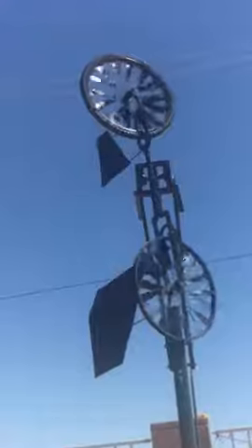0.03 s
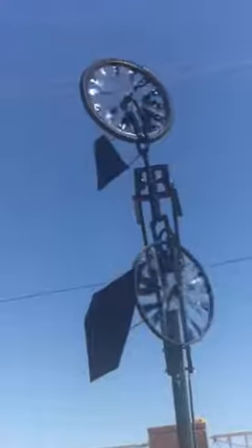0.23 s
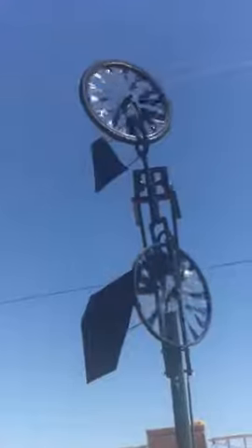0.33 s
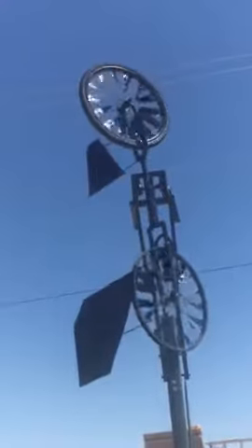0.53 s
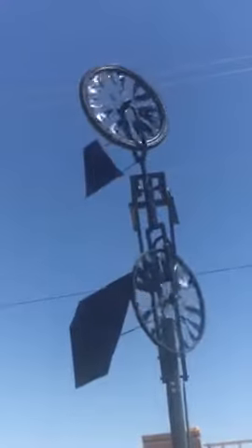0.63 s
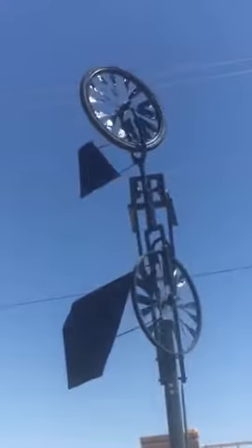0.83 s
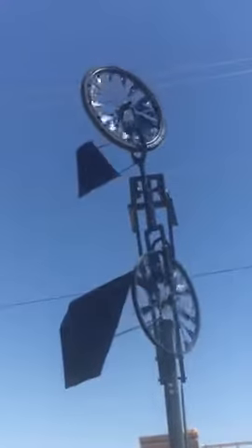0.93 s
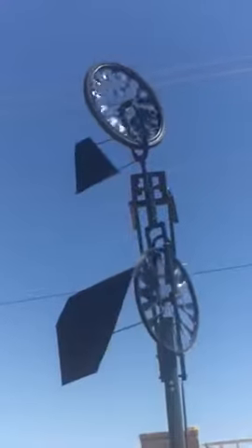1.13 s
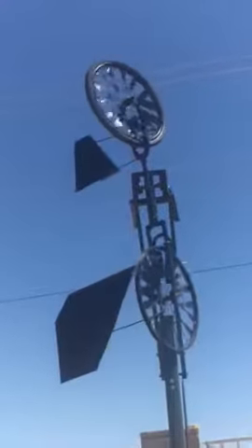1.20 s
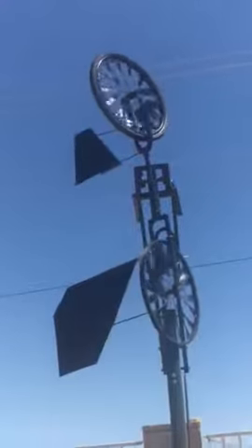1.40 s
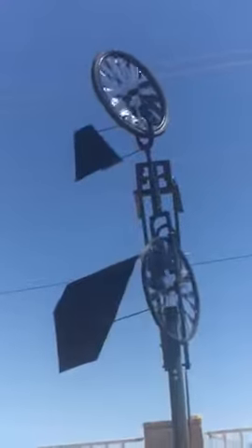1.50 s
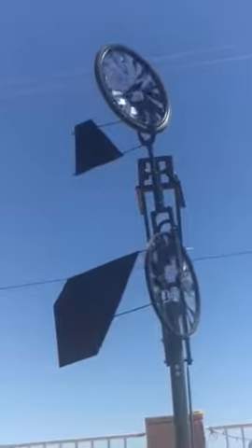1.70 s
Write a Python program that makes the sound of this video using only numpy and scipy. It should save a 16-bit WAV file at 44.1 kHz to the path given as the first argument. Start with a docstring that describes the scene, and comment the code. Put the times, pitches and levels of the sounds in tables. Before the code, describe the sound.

Metal windmill made of bicycle wheels clacking and clinking as it spins, with wind rumbling.

```python
"""Outdoors, at a steel pole: two bicycle wheels with vanes spin as a windmill.
Loose metal parts clack, tick and clink as they turn, ringing the spokes, the rims, the frame
and a small bright part. Rough running keeps two wavering tones humming in the frame.
Wind rumbles and buffets the microphone over faint distant traffic."""
import sys
import numpy as np
from scipy import signal
from scipy.fft import rfft, irfft
from scipy.io import wavfile
from scipy.ndimage import uniform_filter1d

SR = 44100
rng = np.random.default_rng(int(sys.argv[2]) if len(sys.argv) > 2 else 0)


def waveform_to_disk(signal):
    """Save audio, clipped to [-1, 1], as 16-bit WAV at the path in sys.argv[1]."""
    frames = np.transpose(np.atleast_2d(signal))
    scaled = np.clip(frames, -1, 1) * 32767
    samples = np.round(scaled).astype(np.int16)
    wavfile.write(sys.argv[1], SR, samples)


N = 77175

# loose-part contacts: start_s, clack_db, tick_db, clink_db, ping_db
CONTACT_EVENTS = [(0.099, -61, -69, -74, -69), (0.115, -56, -47, -42, -70), (.1482, -59.5, -48, -44.5, -65),
                  (0.187, -76, -55, -54, -84), (.207, -81, -57.5, -62, -91), (0.225, -55.5, -45, -46, -69),
                  (0.3171, -41.5, -52, -51, -49), (0.3406, -42, -49.5, -48, -57),
                  (0.369, -55, -69, -66, -65), (.430, -45, -50.5, -42.5, -51),
                  (0.4531, -46, -51.5, -47, -70), (.481, -50, -58, -51.5, -63),
                  (0.5205, -57, -57.5, -64, -71), (0.5457, -44, -53.5, -46, -54.5),
                  (0.569, -60, -59, -58, -68), (0.6034, -61, -50.5, -56, -68), (.6363, -62, -50, -74, -76),
                  (0.6775, -63.5, -50, -47, -72), (0.7293, -60.5, -55, -70, -68),
                  (0.7515, -46.5, -67, -60, -64), (0.774, -55.5, -67, -64, -72), (.868, -55, -46, -70, -80),
                  (0.957, -78, -54, -49.5, -85), (.978, -60.5, -45, -43.5, -72),
                  (1.002, -74, -52.5, -48, -83), (1.017, -64, -48, -47, -72),
                  (1.059, -54, -43.5, -39.5, -60), (1.094, -50.5, -52.5, -69, -54),
                  (1.1697, -47.5, -57, -64, -54.5), (1.209, -49.5, -59, -76, -54.5),
                  (1.251, -45.5, -53.5, -67, -55), (1.283, -44, -52, -71, -51.5),
                  (1.343, -43.5, -51.5, -61, -48.5), (1.369, -45.5, -53, -65, -65),
                  (1.463, -48, -47.5, -51, -53), (1.483, -47, -49, -65, -66), (1.521, -57, -63, -82, -65.5),
                  (1.6512, -52, -46, -42.5, -67), (1.697, -54.5, -54.5, -60, -73)]
# bright clack resonances: centre_hz, width_hz, level_db
CLACK_RESONANCES = [(1250, 550, -8), (2250, 240, -7), (2870, 122, -4), (3760, 130, -9), (4040, 105, -5.5),
                    (4650, 100, -7.5), (5950, 210, -5), (6340, 310, -0.5), (6580, 330, 2),
                    (7430, 440, -5.5), (8590, 455, 2), (9170, 510, -11), (9900, 870, -15.5),
                    (12100, 5600, -17), (15600, 830, -25)]
# dull tick resonances: centre_hz, width_hz, level_db
TICK_RESONANCES = [(1650, 278, -4.5), (2250, 490, -7), (3040, 160, -5.5), (3630, 330, -5.5),
                   (4334, 280, -1.5), (4630, 81, -3.5), (5320, 620, -5.5), (5610, 260, -5.5),
                   (6440, 270, -7.5), (7100, 150, -13), (8050, 230, -34.5), (11400, 1300, -29),
                   (13130, 150, -25)]
# rim and frame modes: pitch_hz, level_db
FRAME_MODES = [(985, -2), (1653, -5), (1760, -6), (1997, -3), (2166, -3), (2245, -4), (2536, -6),
               (2912, -4), (3133, -8), (3682, -6), (4059, -3), (4210, -6), (6254, -7), (6652, -6),
               (7868, -8)]
# spoke shimmer spectrum: freq_hz, gain_db
SPOKE_SPECTRUM = [(600, 1.5), (2000, 5.5), (4500, 6.5), (6500, 2.5), (9000, 3), (13000, -22), (16000, -4)]
# spoke shimmer decay: freq_hz, t60_s
SPOKE_DECAY = [(600, 0.28), (2000, 0.12), (4500, 0.15), (8000, 0.14), (14000, 0.16)]
# frame hum envelopes: time_s, low_tone_db, high_tone_db
HUM_LEVELS = [(.05, -74.5, -70.5), (.17, -75, -65.5), (.34, -71, -60), (.41, -80, -70.5), (.48, -79, -55.5),
              (.57, -64.5, -82.5), (.7, -80, -63), (.79, -61.5, -62.5), (.9, -69.5, -67.5), (.97, -67, -68),
              (1.03, -64, -55), (1.1, -77, -61.5), (1.16, -76, -67), (1.3, -58, -61.5),
              (1.37, -66.5, -60.5), (1.45, -79, -66.5), (1.6, -69.5, -70), (1.719, -67, -63)]
# low hum resonances: centre_hz, width_hz, level_db
HUM_LOW = [(698.5, 11.8, 6.5), (622, 26, -11)]
# high hum resonances: centre_hz, width_hz, level_db
HUM_HIGH = [(1047, 27, -0.5), (1141, 10.6, -7.5), (1067, 86, -18.5)]
# wander of the high hum: time_s, pitch_hz
HUM_HIGH_PITCH = [(.1, 1060), (.24, 1071), (.33, 990), (.39, 1040), (.47, 1075), (.51, 1020), (.6, 1038),
                  (.79, 1060), (1.03, 1051), (1.1, 1045), (1.3, 1062), (1.72, 1054)]
# gusts at the microphone: time_s, level_db
GUST_LEVELS = [(.02, -55.5), (.12, -54), (.18, -56.5), (.25, -47), (.34, -51), (.42, -53), (.5, -42.5),
               (.55, -49), (.63, -50), (0.668, -52), (.71, -48.5), (.82, -59.5), (.95, -53.5), (1.04, -48),
               (1.15, -52), (1.24, -49), (1.31, -54.5), (1.45, -56.5), (1.75, -55.5)]
# wind rumble spectrum: freq_hz, gain_db
WIND_SPECTRUM = [(15, -12), (30, -10), (52, 3), (80, -3), (140, -3.5), (200, -14), (290, -25.5),
                 (400, -29.5), (800, -37), (2000, -57)]
# single buffets: start_s, peak_db, pitch_hz, length_s
WIND_BUFFETS = [(0.264, -35, 110, 0.02), (0.268, -45, 241.3, 0.014), (.561, -37, 296, 0.0087),
                (0.564, -25, 67, 0.018), (.588, -33, 223, 0.0098), (0.591, -27, 67.3, 0.0275),
                (0.999, -33.5, 44.4, 0.027)]
# distant traffic and air spectrum: freq_hz, gain_db
TRAFFIC_SPECTRUM = [(60, 0.5), (250, 4), (400, -6.5), (500, -6.5), (640, 1.5), (830, -5.5), (1060, 1.5),
                    (1300, -7), (2200, -5), (3200, -11), (5000, -17), (8000, -21), (11000, -23.5),
                    (16000, -33.5)]
# microphone dips: centre_hz, quality
MIC_NOTCHES = [(4980, 18), (10650, 30)]


def wheels():
    """Each contact blends clack, tick and clink, and rings the frame and the small bright part."""
    out, t = np.zeros(N), np.arange(SR * 2 // 5) / SR
    bright, dull = response(CLACK_RESONANCES), response(TICK_RESONANCES)
    onset = 1 - np.exp(-t / .0007)
    for start_s, clack_db, tick_db, clink_db, ping_db in CONTACT_EVENTS:
        clack = amp(clack_db) * knock(
            t, bright, chatter_s=.0024, rattle_db=-13, rattle_t60_s=.096, spokes_db=-9.5, echo_db=-13)
        tick = amp(tick_db) * knock(
            t, dull, chatter_s=.0016, rattle_db=-22, rattle_t60_s=.019, spokes_db=-12.5, echo_db=-4)
        strength = np.hypot(amp(clack_db), amp(tick_db))
        frame = amp(-17.5) * strength * ring(FRAME_MODES, t, t60_s=.27, detune=.0017)
        ping = ring([(11405, 0)], t, t60_s=.14, detune=.0003)  # small bright part
        ping += ring([(15075, -15)], t, t60_s=.18, detune=.00056)
        add(out, start_s, clack + tick + onset * (frame + amp(ping_db) * ping))
        add(out, start_s, amp(clink_db) * clink())
    return out


def knock(t, body, chatter_s, rattle_db, rattle_t60_s, spokes_db, echo_db, echo_s=.0066):
    """A contact chatters into the body, echoes off the ground, rattles out and excites the spokes."""
    contact = np.exp(-(t / chatter_s) ** 4)
    chatter = contact * rng.choice([-1., 1.], len(t))
    blow = signal.fftconvolve(chatter, body)[:len(t)]
    blow *= np.linalg.norm(contact) / np.linalg.norm(blow)
    rattle = amp(rattle_db - 60 * t / rattle_t60_s) * rng.standard_normal(len(t))
    onset = 1 - np.exp(-t / .0006)
    tail = onset * (rattle + amp(spokes_db) * spokes(len(t)))
    out = blow + signal.fftconvolve(tail, body)[:len(t)]
    add(out, echo_s, amp(echo_db) * blow)
    return out


def clink(pitch_hz=4591, length_s=.0047):
    """Hard, quickly damped note of the part making contact."""
    t = np.arange(0, length_s, 1 / SR)
    hz = pitch_hz * (1 + .004 * rng.standard_normal())
    return np.sin(np.pi * (t / length_s) ** .87) * np.sin(2 * np.pi * hz * t)


def ring(modes, t, t60_s, detune, flutter_db=3):
    """Struck metal: decaying sines (pitch_hz, level_db) with random phase and level flutter."""
    out = np.zeros(len(t))
    for hz, db in modes:
        flutter = np.interp(t, np.arange(64) / 80, rng.standard_normal(64))
        cycles = hz * (1 + detune * rng.standard_normal()) * t + rng.random()
        out += amp(db + flutter_db * flutter - 60 * t / t60_s) * np.sin(2 * np.pi * cycles)
    return out


def spokes(size):
    """Shimmer of dense spoke modes: noise whose lows ring longest."""
    hz, t, bins = signal.stft(rng.standard_normal(size), SR, nperseg=256)
    gain_db = read(SPOKE_SPECTRUM, hz)[:, None] - 60 * t / read(SPOKE_DECAY, hz)[:, None]
    return signal.istft(bins * amp(gain_db), SR, nperseg=256)[1][:size]


def frame_hum():
    """Rough running sustains two narrow noise tones in the frame; the higher wanders in pitch."""
    time_s, low_db, high_db = np.transpose(HUM_LEVELS)
    out, t, hz = np.zeros(N), np.arange(N) / SR, np.fft.rfftfreq(N, 1 / SR)
    shift_hz = np.interp(t, *np.transpose(HUM_HIGH_PITCH)) - HUM_HIGH[0][0]
    for body, db, shift_cycles in (HUM_LOW, low_db, 0), (HUM_HIGH, high_db, np.cumsum(shift_hz) / SR):
        tone = irfft(rfft(rng.standard_normal(N)) * np.sqrt(resonances(body, hz)), N)
        tone = (signal.hilbert(tone) * np.exp(2j * np.pi * shift_cycles)).real
        out += levelled(tone, size=2000) * amp(np.interp(t, time_s, db))
    return out


def wind():
    """Gusty rumble at the microphone, plus short pushes of air."""
    gust_db = np.interp(np.arange(N) / SR, *np.transpose(GUST_LEVELS))
    out = levelled(noise(WIND_SPECTRUM), size=3000) * amp(gust_db)
    for start_s, peak_db, hz, length_s in WIND_BUFFETS:
        t = np.arange(0, length_s, 1 / SR)
        add(out, start_s, amp(peak_db) * np.sin(np.pi * t / length_s) * np.sin(2 * np.pi * hz * t))
    return out


def traffic(level_db=-61.5):
    """Steady wash of far road and air."""
    return amp(level_db) * noise(TRAFFIC_SPECTRUM)


def amp(db):
    """Decibels to gain."""
    return 10 ** (np.asarray(db) / 20)


def read(points, hz):
    """Table lookup on a log-frequency axis."""
    freq_hz, value = np.transpose(points)
    return np.interp(np.log(hz + 1), np.log(freq_hz + 1), value)


def add(mix, start_s, sound):
    """Mixes a sound in at start_s."""
    part = mix[max(round(start_s * SR), 0):][:len(sound)]
    part += sound[:len(part)]


def noise(spectrum):
    """Steady unit-rms noise with the given spectrum."""
    gain = amp(read(spectrum, np.fft.rfftfreq(N, 1 / SR)))
    x = irfft(rfft(rng.standard_normal(N)) * gain, N)
    return x / np.sqrt(np.mean(x ** 2) + 1e-20)


def levelled(x, size):
    """Removes slow swings: unit rms over a sliding window of size samples."""
    return x / np.sqrt(uniform_filter1d(x ** 2, size=size) + 1e-9)


def resonances(body, hz):
    """Power spectrum of a set of resonances."""
    return sum(amp(db) ** 2 / (1 + ((hz - centre_hz) / width_hz) ** 2) ** 2
               for centre_hz, width_hz, db in body)


def response(body, size=4096):
    """Minimum-phase, unit-energy impulse response of a set of resonances."""
    hz = abs(np.fft.fftfreq(size, 1 / SR))
    log_gain = np.log(resonances(body, hz) + 1e-7) / 2
    impulse = np.fft.ifft(np.exp(np.conj(signal.hilbert(log_gain)))).real[:size // 4]
    return impulse / np.linalg.norm(impulse)


def scene():
    """Windmill, wind and far road, in mono."""
    return (wheels() + frame_hum() + wind() + traffic())[None]


def record(dry):
    """Microphone: narrow dips, low cut, band limit; the sound fades in quickly after a brief silence."""
    open_s, fade_s, low_cut_hz, high_cut_hz = .019, .002, 38, 16100
    x = dry * np.clip((np.arange(N) / SR - open_s) / fade_s, .02, 1)
    for hz, quality in MIC_NOTCHES:
        x = signal.lfilter(*signal.iirnotch(hz, quality, fs=SR), x)
    x = signal.sosfilt(signal.butter(6, low_cut_hz, "high", fs=SR, output="sos"), x)
    lowpass = signal.firwin(301, high_cut_hz, window=("kaiser", 9), fs=SR)
    return signal.oaconvolve(x, lowpass[None], "same")


dry = scene()
out = record(dry)
waveform_to_disk(out)
```